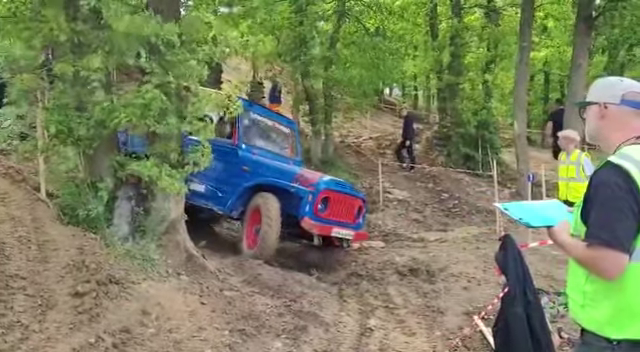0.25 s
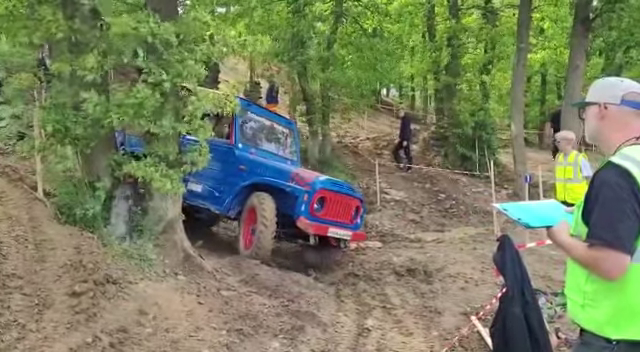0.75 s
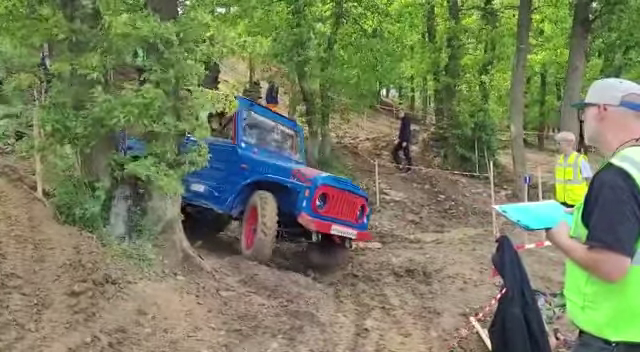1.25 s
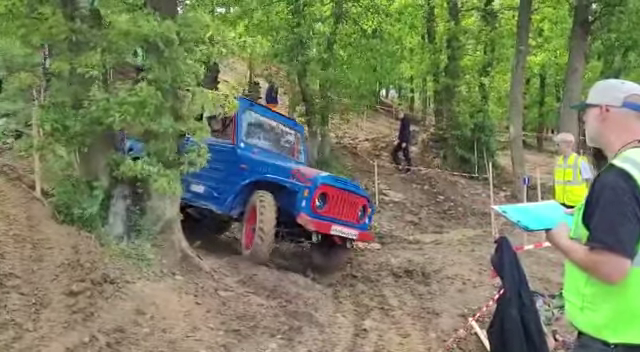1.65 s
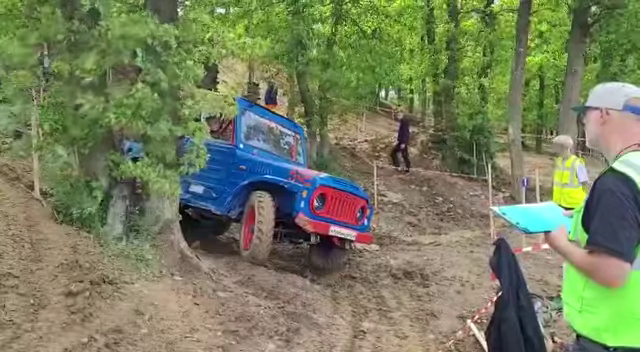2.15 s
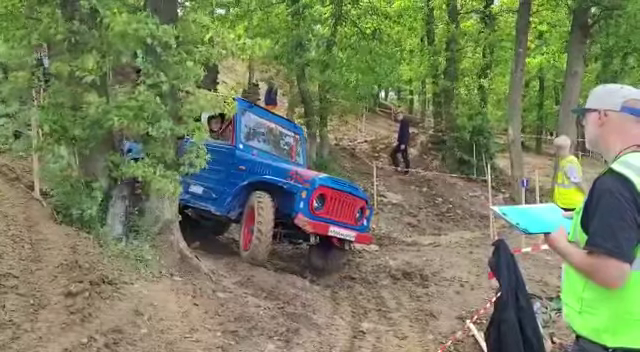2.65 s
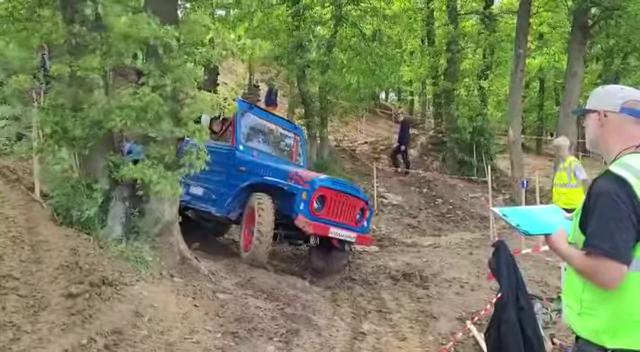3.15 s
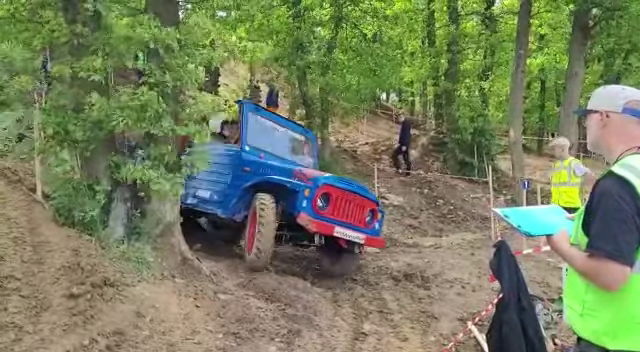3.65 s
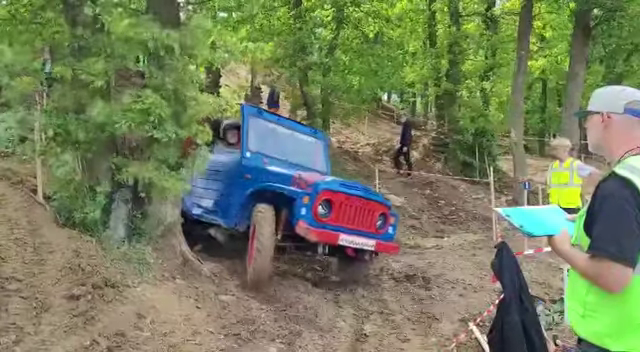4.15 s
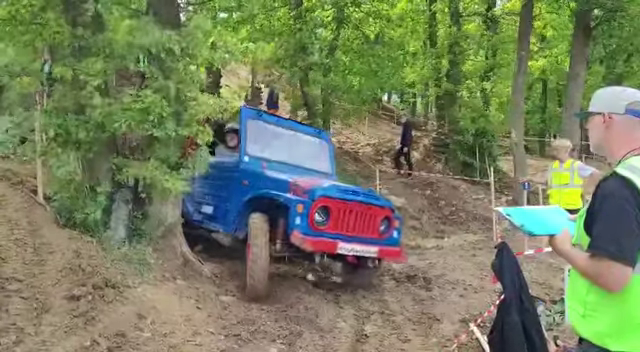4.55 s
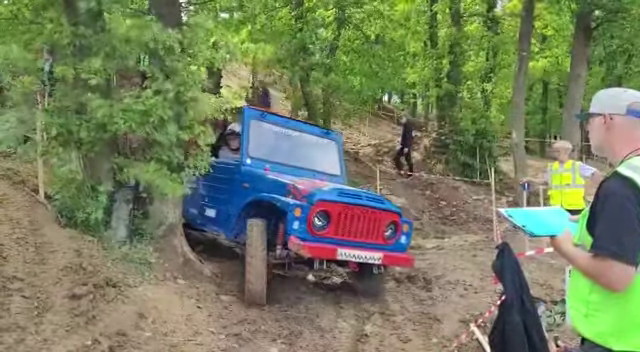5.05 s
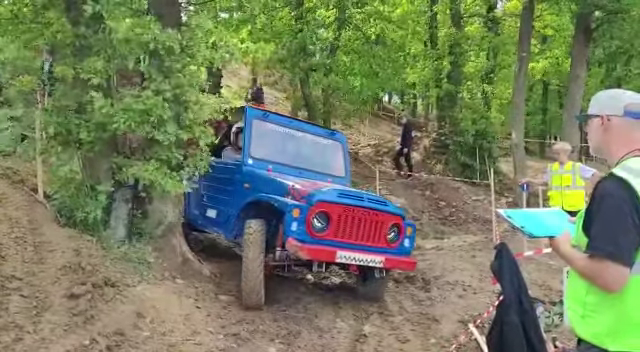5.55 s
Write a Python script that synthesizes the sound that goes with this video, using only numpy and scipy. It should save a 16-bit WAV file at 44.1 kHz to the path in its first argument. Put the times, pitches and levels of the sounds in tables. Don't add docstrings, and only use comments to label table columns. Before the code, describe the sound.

A small four-cylinder off-road engine works along a muddy forest track, roughly ten metres from an outdoor stereo microphone. It starts with the throttle already open, a short bark closing by 0.3 s, while revs rise and then settle. At 0.9 s a full blip barks for a quarter second, its intake ringing hollow and hissing with small spits as the clutch drags the revs. From 1.5 to 2.8 s it sinks into a low, lumpy idle. A slight touch at 2.9 s and a firm rattling jolt lead to the longest, loudest bark at 3.2-3.5 s. A brief unloaded flare of revs follows at about 4 s. Then the engine slows while valve clatter, fan, tyres and loose panels grow louder as it nears, with a light jolt at 4.2 s and a harder one at 5.4 s. A second engine drones further off, swelling around 0.7 and 2.8 s; trunks add faint echo.

```python
import sys
import numpy as np
from scipy import signal
from scipy.fft import rfft, irfft, next_fast_len
from scipy.io import wavfile
from scipy.ndimage import uniform_filter1d, map_coordinates

SR = 44100
rng = np.random.default_rng(int(sys.argv[2]) if len(sys.argv) > 2 else 0)


def volts(x):
    e = np.asarray(x, float) / 20
    return 10 ** e


def dump(signal):
    limited = np.clip(np.atleast_2d(signal).T, -1, 1)
    pcm = np.round(limited * 32767).astype(np.int16)
    wavfile.write(sys.argv[1], SR, pcm)


N = 255780
SECONDS = np.arange(N) / SR


def unit(x):
    return x / np.sqrt(np.mean(x ** 2) + 1e-20)


def along(points, hz):
    f, v = np.transpose(points)
    return np.interp(np.log(hz + 1), np.log(f + 1), v)


def curves(rows):
    s, *columns = np.transpose(rows)
    return [np.interp(SECONDS, s, column) for column in columns]


def wobble(rate):
    return map_coordinates(rng.standard_normal(int(N * rate / SR) + 4), [np.arange(N) * rate / SR])


def filtered(x, response):
    m = next_fast_len(N + SR // 2)
    return irfft(rfft(x, m) * response(np.fft.rfftfreq(m, 1 / SR)), m)[..., :N]


def modes(table):
    def response(f):
        return sum((-1) ** k * volts(db) * 1j * f * width / (centre ** 2 - f * f + 1j * f * width)
                   for k, (centre, width, db) in enumerate(table))
    return response


def both(*db):
    return 10 * np.log10(sum(volts(2 * d) for d in db))


def puffs(cycles, fall):
    return np.exp(-fall * (cycles % 1))


# start_s, held_s, opening_db, bark_db, clutch_drag_hz (negative: unloaded, revs flare)
BLIPS = [
    (-0.015, .24, -7, -26.5, 0.5),
    (0.9, 0.2245, 0.5, -23, 9),
    (2.86, 0.084, -22.5, -32, 0.5),
    (3.197, 0.2767, 0, -19.5, 8),
    (3.96, 0.096, -11.5, -33.5, -15),
]


def throttle(peaks_db, lead_s, lag_s, rise_s, fall_s):
    levels = []
    for (s, held, *_), peak_db in zip(BLIPS, peaks_db):
        before = (s - lead_s - SECONDS) / rise_s
        after = (SECONDS - s - held - lag_s) / fall_s
        levels.append(peak_db - 20 * np.clip(np.maximum(before, after), 0, 5))
    return both(*levels)


# start_s, firing_hz, boom_db
ENGINE = [(0.0, 78.8, -26), (0.11, 84.4, -13), (0.28, 104.3, -24.5), (0.66, 82.75, -23.5),
          (0.84, 88.6, -29.5), (0.95, 102.9, -21), (1.19, 102.7, -22), (1.38, 88.5, -21),
          (1.5, 82.94, -31.5), (2.3, 68.4, -30), (2.68, 67.05, -22.5), (2.9, 74.47, -23.5),
          (3.14, 73, -28.5), (3.3, 89.2, -14), (3.53, 92.25, -21), (3.91, 72.25, -28.5), (4.3, 79.7, -31),
          (5.8, 62.5, -23)]
BITE_S, LET_GO_S, FLARE_S = 0.0717, 0.0604, 0.22
BOG_DB_PER_HZ, HISS_BOGS, THIRD_BOGS = 0.4, 0.23, 0.9
KICK_DB, KICK_S = 1, 0.05
BOOM_DB, RING_DB, HISS_DB, THIRD_DB = -16, -25, -45.5, 0.5
SHUT_BARK_DB, IDLE_RING_DB, SHUT_HISS_DB = -15.5, -13, -60.5
RING_FOLLOWS, HISS_FOLLOWS = 0.7, 0.49
LEAK_FOLLOWS = 0.34


def driver():
    free_hz, shut_db = curves(ENGINE)
    drag_hz = kick_db = 0
    for s, held, _, _, hz in BLIPS:
        free_s = LET_GO_S if hz > 0 else FLARE_S
        knots = [s + BITE_S * (hz > 0), s + held, s + held + free_s]
        drag_hz = drag_hz + hz * np.interp(SECONDS, knots, [0, 1, 0])
        knots = [s, s + KICK_S, s + 2 * KICK_S]
        kick_db = kick_db + np.interp(SECONDS, knots, [KICK_DB, KICK_DB, 0], left=0)
    _, _, open_db, barks_db, _ = np.transpose(BLIPS)
    bog_db = -BOG_DB_PER_HZ * np.maximum(drag_hz, 0)

    boom_db = both(shut_db, BOOM_DB + bog_db + kick_db + throttle(open_db, 0, -.01, .03, .05))
    bark_db = both(shut_db + SHUT_BARK_DB, bog_db + kick_db + throttle(barks_db, -.005, -.02, .05, .07))
    ring_db = both(shut_db + IDLE_RING_DB, RING_DB + throttle(RING_FOLLOWS * open_db, .008, .003, .05, .03))
    leak_db = SHUT_HISS_DB + LEAK_FOLLOWS * nearness(free_hz)[0]
    rush_db = HISS_DB + HISS_BOGS * bog_db + throttle(HISS_FOLLOWS * open_db, .003, .036, .045, .045)
    return free_hz - drag_hz, boom_db, bark_db, THIRD_DB + THIRD_BOGS * bog_db, ring_db, both(leak_db, rush_db)


# pitch_hz, gain_db
PIPE = [(150, -14), (210, -12), (250, -2), (265, -4), (300, -5), (345, -20), (400, -14), (450, -26),
        (520, -22)]
# pitch_hz, gain_db
SILENCER = [(110, -21), (128, -3), (146, 0.5), (175, 0.5), (200, -4)]
HALF_DB, THREE_HALVES_DB = -38, -16


def exhaust(hz, firings, boom_db, bark_db, third_db):
    turn = 2 * np.pi * firings

    def order(k):
        return volts(along(PIPE, k * hz) + 1.82 * wobble(19)) * np.cos(k * turn)

    lumpy_db = np.interp(boom_db, [-30, -17], [2, .5])
    boom = volts(lumpy_db * wobble(23)) * np.cos(turn) + volts(-13) * (order(4) + order(5))
    half = volts(HALF_DB) * np.cos(turn / 2)
    three_halves = volts(THREE_HALVES_DB + along(SILENCER, 3 * hz / 2)) * np.cos(3 * turn / 2)
    shaft = volts(2 * wobble(9)) * (half + three_halves)
    bark = volts(along(SILENCER, 2 * hz)) * np.cos(2 * turn) + volts(third_db) * order(3)
    return np.sqrt(2) * (volts(boom_db) * (boom + shaft) + volts(bark_db) * bark)


CYLINDERS = [0, -15, -1, -13]
# pitch_hz, width_hz, level_db
AIR_BOX = [(634, 44, 0), (520, 30, -12), (800, 60, -16), (1100, 50, -21), (1340, 50, -25)]
SHUT_DB = -35


def intake(firings, ring_db):
    stroke = firings.astype(int)
    size_db = np.take(CYLINDERS, stroke % 4) + .8 * rng.standard_normal(N)[stroke]
    pulses = np.diff(stroke, prepend=stroke[0]) * volts(size_db)
    swirl = rng.standard_normal(N) * volts(size_db) * (.4 + puffs(firings, fall=2))
    rough = np.interp(ring_db, [-36, -26], [.6, .07])
    drive = np.sqrt(1 - rough) * unit(pulses) + np.sqrt(rough) * unit(swirl)
    box = modes(AIR_BOX)
    neck = modes([(640, 150, 0)])
    level = np.sqrt(np.clip(volts(2 * ring_db) - volts(2 * SHUT_DB), 0, None))
    return level * unit(filtered(drive, lambda f: box(f) * (.2 + neck(f)) / (1 + 1j * f / 1200.)))


# pitch_hz, left_right_likeness
ALIKE = [(30, 0.65), (70, 0.67), (380, 0.91), (950, 0.78), (2400, 0.58), (6000, 0.33), (10000, 0.035),
         (15000, 0.046)]


def rush(spectrum, gate, patchy_db):
    z = signal.stft(rng.standard_normal((2, N)), nperseg=512)[2]
    field = rng.standard_normal(z.shape[1:])
    field = uniform_filter1d(uniform_filter1d(field, 6, 0), 10, 1)
    pair = gate * signal.istft(z * volts(patchy_db * unit(field)), nperseg=512)[1][:, :N]
    pair = pair / np.sqrt(uniform_filter1d(gate ** 2, size=4096))

    def colour(hz):
        angle = np.arccos(np.clip(along(ALIKE, hz), -1, 1)) / 2
        return volts(along(spectrum, hz)) * [np.cos(angle), np.sin(angle)]

    mid, side = filtered(pair, colour)
    return unit(np.array([mid + side, mid - side]))


SPIT_DB, SPIT_FADE_DB = -37, 0.2


def spit_times(firings):
    rows = []
    for s, held, open_db, *_ in BLIPS:
        first = np.interp(s, SECONDS, firings) + min(s, 0) * ENGINE[0][1]
        for k in range(8):
            spit_s = np.interp(first + 4 * k, firings, SECONDS)
            if 0 < spit_s < s + held + .005:
                rows.append((spit_s, SPIT_DB + HISS_FOLLOWS * open_db - SPIT_FADE_DB * k))
    s, db = np.transpose(rows)
    return s, db + 0.59 * rng.standard_normal(size=64)[:len(s)]


# pitch_hz, density_db_per_hz
HISS = [(2000, -28), (3500, -10), (5000, -4.5), (7500, -4.5), (10000, -13.5), (12500, -7), (15600, -12.5)]


def hiss(firings, hiss_db):
    breath = np.interp(hiss_db, [-61, -52], [.3, 1])
    gate = 1 + breath * uniform_filter1d(0.87 * puffs(firings / 2, fall=4.0), size=130)
    air = rush(HISS, gate, patchy_db=4.4)
    s, db = spit_times(firings)
    u = np.arange(SR // 20) / SR / 0.0056
    clicks = np.bincount((s * SR).astype(int), volts(db - 3.5), N)
    spits = signal.fftconvolve(clicks, u * np.exp(1 - u))[:N]
    bright = unit(np.diff(air[:, ::-1], prepend=0))
    gusts_db = .8 * wobble(14)
    return volts(hiss_db + 1.0 + gusts_db) * air + spits * bright


# start_s, distance_m
DISTANCE = [(0, 9.85), (2.5, 10.4), (3.7, 9.2), (4.4, 6.8), (5.1, 5.66), (5.8, 5.17)]
REVS_DB_PER_OCTAVE = 6


def nearness(hz):
    near_db = -20 * np.log10(curves(DISTANCE)[0] / 10)
    return near_db + REVS_DB_PER_OCTAVE * np.log2(hz / 80), near_db


# pitch_hz, width_hz, level_db
PANELS = [(534, 23.3, 7.5), (647, 57, 3.5), (943, 35, -0.5), (1196, 108, -8), (1702, 34, -9.5),
          (2140, 220, -18), (2694, 116, -16.5), (3180, 147, -18.5)]


def rattle():
    taps = (rng.random((2, N)) < 500 / SR) * rng.standard_normal((2, N))
    near, spread = filtered(taps, modes(PANELS))
    return unit(near + 0.078 * spread * [[1], [-1]])


# pitch_hz, density_db_per_hz
CLATTER = [(88, -40), (170, -3), (264, -1.5), (378, -13), (450, -7), (560, -7.5), (700, -6.5), (850, -11),
           (1300, -14.5), (2400, -21), (4000, -33), (6500, -34.5), (9000, -48), (16000, -90)]
# pitch_hz, density_db_per_hz
RUMBLE = [(15, -38), (30, -12), (50, 9.5), (70, 10), (120, 7.5), (170, -1), (260, -43.5)]
# start_s, firing_hz, level_db
FAR = [(0.0, 96.1, -68), (0.35, 104.6, -30.5), (0.71, 114.6, -25), (0.95, 119.1, -28.5),
       (1.23, 134.2, -27.5), (1.42, 131, -30.5), (1.73, 117.5, -38), (2.1, 120, -35.5), (2.36, 101.4, -43),
       (2.57, 108.2, -26.5), (2.81, 112.1, -24), (3.12, 108, -29), (3.36, 103.6, -32), (3.63, 112.5, -36),
       (4.12, 114.1, -29.5), (4.6, 115.4, -38.5), (5.2, 111.4, -30.5), (5.8, 108, -36)]
# start_s, clatter_gain_db
JOLTS = [
    (2.99, 2),
    (4.2, 1.5),
    (5.38, 2.5),
]
JOLT_S = 0.031
CLATTER_DB, RUMBLE_DB = -41.5, -37
CLATTER_FOLLOWS, RUMBLE_FOLLOWS = 0.15, 0.47
STRAIN_DB, STRAIN_S = 3.5, 0.19
STRAIN_FROM_HZ, STRAIN_SPAN_HZ = 71.6, 20.5
DRONE_HZ, DRONE_STAYS, DRONE_FOLLOWS = 860, 0.43, 0.17


def works(firings, hz, boom_db, hiss_db):
    busy_db, near_db = nearness(hz)
    jolt_db = sum(db * np.exp(-((SECONDS - s) / JOLT_S) ** 2) for s, db in JOLTS)
    load_db = CLATTER_FOLLOWS * (np.minimum(boom_db, -22) + 26)
    strain = np.interp(hiss_db, [HISS_DB - 6.5, HISS_DB], [0, 1])
    strain = uniform_filter1d(strain, max(int(STRAIN_S * SR), 1))
    strain_db = STRAIN_DB * strain * np.maximum(hz - STRAIN_FROM_HZ, 0) / STRAIN_SPAN_HZ
    clatter_db = CLATTER_DB + busy_db + jolt_db + load_db + strain_db + 0.73 * wobble(4.01)
    rumble_db = RUMBLE_DB + near_db / 2 + RUMBLE_FOLLOWS * (boom_db + 24.5) + 1.64 * wobble(15)

    ticks = 1 + 0.33 * puffs(firings / 2, fall=2.4)
    clatter = rush(CLATTER, ticks, patchy_db=1.53) + volts(-7.0) * rattle()
    drone_db = DRONE_FOLLOWS * (curves(FAR)[1] + 32) - DRONE_STAYS * near_db
    low = filtered(clatter, lambda f: 1 / (1 + (f / DRONE_HZ) ** 4))
    clatter = clatter + (volts(drone_db) - 1) * low
    rumble = rush(RUMBLE, np.ones(N), patchy_db=0.5)
    return volts(clatter_db + 8) * clatter + volts(rumble_db + 7.0) * rumble


FAR_HALF_DB = -10


def far_engine():
    hz, db = curves(FAR)
    turn = 2 * np.pi * np.cumsum(hz) / SR
    firing = volts(db + 1.5 * wobble(12)) * np.cos(turn)
    shaft = volts(db + FAR_HALF_DB + 2 * wobble(8)) * np.cos(turn / 2)
    return np.sqrt(2) * (firing + shaft)


# pitch_hz, t60_s
TREES = [(60, 1), (600, 0.8), (4000, 0.55)]


def wood(x):
    hz, t, z = signal.stft(rng.standard_normal((2, SR // 2)), SR, nperseg=256)
    decay = volts(-60 * t / along(TREES, hz)[:, None])
    tail = signal.istft(z * decay, SR, nperseg=256)[1]
    return signal.fftconvolve(x[None], tail / np.linalg.norm(tail[0]), axes=1)[:, :N]


def scene():
    hz, boom_db, bark_db, third_db, ring_db, hiss_db = driver()
    firings = np.cumsum(hz * (1 + .003 * wobble(25))) / SR
    tonal = exhaust(hz, firings, boom_db, bark_db, third_db)
    tonal = tonal + intake(firings + 0.87, ring_db) + far_engine()
    noise = hiss(firings, hiss_db) + works(firings, hz, boom_db, hiss_db)
    return tonal + volts(-15) * wood(tonal) + noise


def band_limit(x):
    return signal.sosfilt(signal.butter(12, 15710, fs=SR, output="sos"), x)


# start_s (middle), half_length_s, gain_db
DUCKS = [
    (2.321, 0.021, -13),
    (4.257, 0.018, -17),
    (4.857, 0.016, -17),
]
# pitch_hz, gain_db
MIC = [(3200, -1), (3700, 1), (4150, -5), (4500, 0.5), (4900, 2.5), (5400, -3), (6200, 2.5), (7000, -2),
       (8000, -0.5), (8700, -4.5), (9800, 1.5)]
# pitch_hz, left_minus_right_db
LEAN = [(30, -2), (70, -.3), (250, -.7), (600, -1.8), (1200, -2.5), (2500, -.5), (5000, .4), (9000, .9),
        (14000, -.3)]
# start_s, left_delay_s
LAG = [(0, -.00002), (2.5, 0.), (5.8, .00002)]


def record(dry):
    cut_db = sum(db * np.exp(-((SECONDS - s) / half) ** 4) for s, half, db in DUCKS)
    bass = filtered(dry, lambda hz: 1 / (1 + (hz / 140.0) ** 4))
    dry = dry - (1 - volts(cut_db)) * bass
    sides = np.array([[.5], [-.5]])
    left, right = filtered(dry, lambda hz: volts(along(MIC, hz) + along(LEAN, hz) * sides))
    left = map_coordinates(left, [np.arange(N) - SR * curves(LAG)[0]], mode="nearest")
    return band_limit(np.array([left, right]))


dry = scene()
out = record(dry)
dump(out)
```